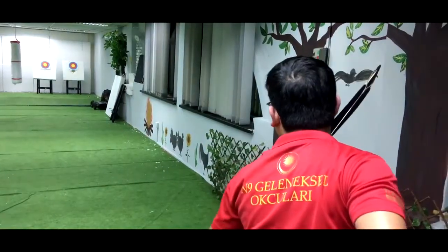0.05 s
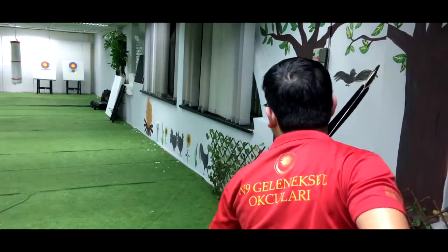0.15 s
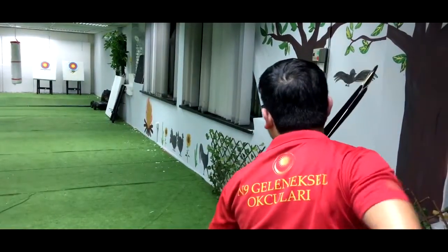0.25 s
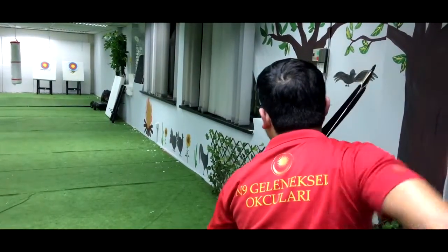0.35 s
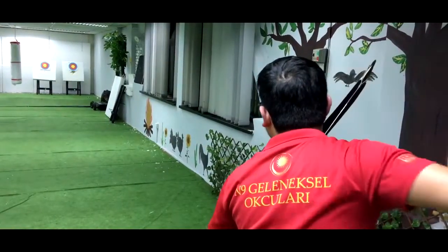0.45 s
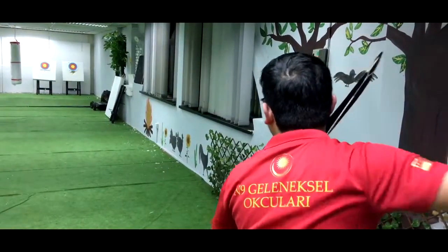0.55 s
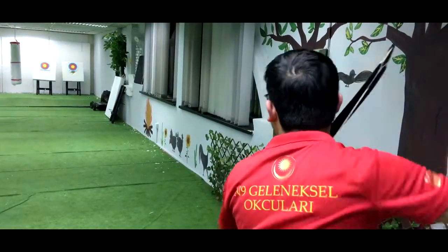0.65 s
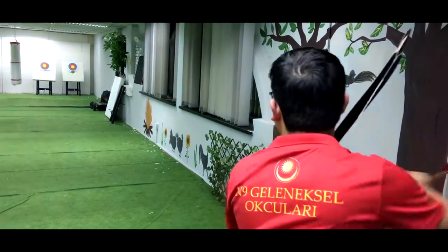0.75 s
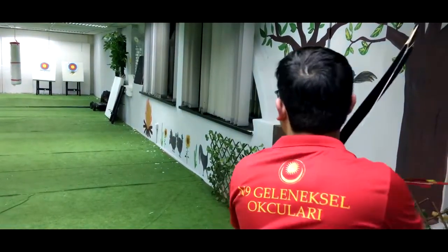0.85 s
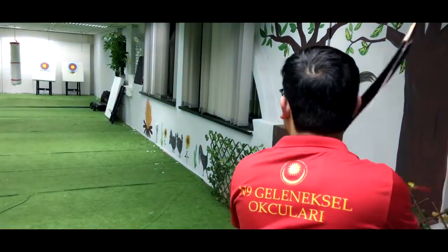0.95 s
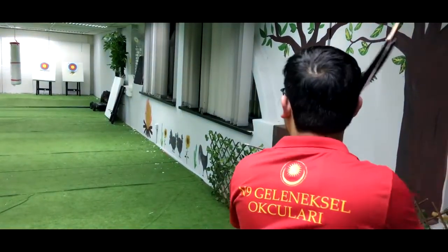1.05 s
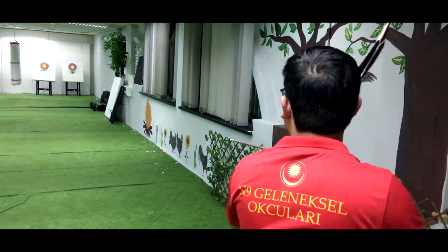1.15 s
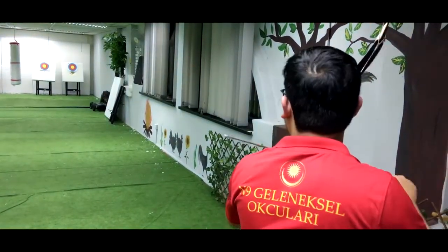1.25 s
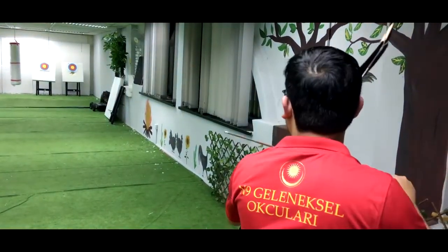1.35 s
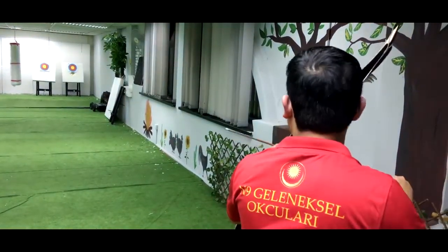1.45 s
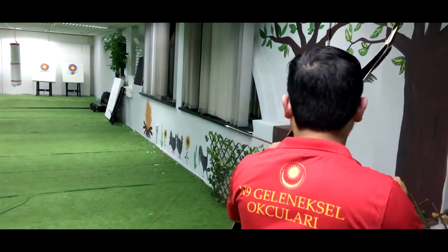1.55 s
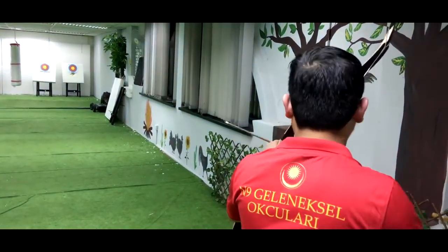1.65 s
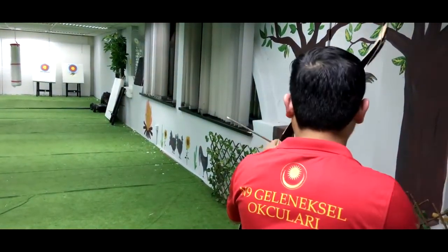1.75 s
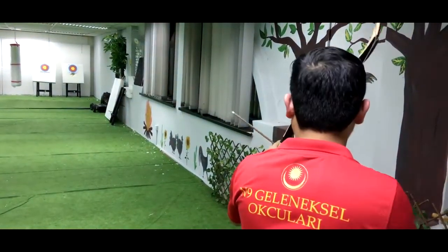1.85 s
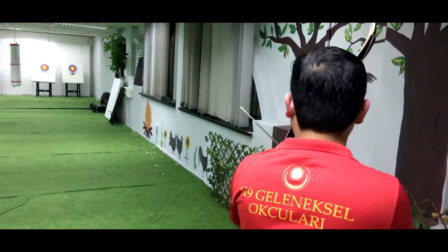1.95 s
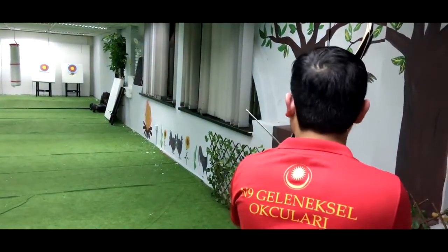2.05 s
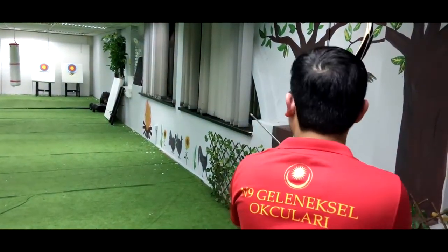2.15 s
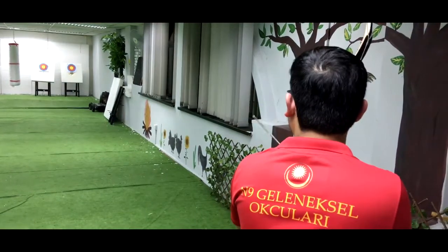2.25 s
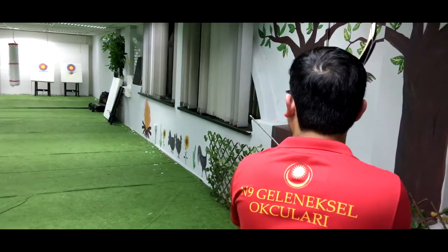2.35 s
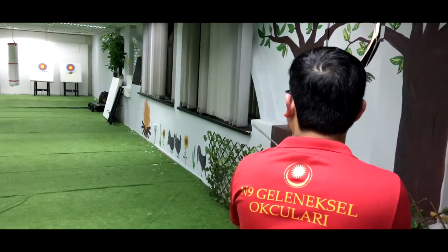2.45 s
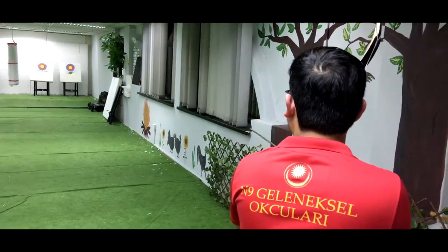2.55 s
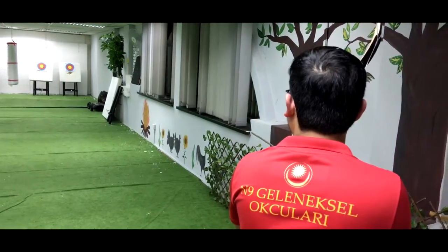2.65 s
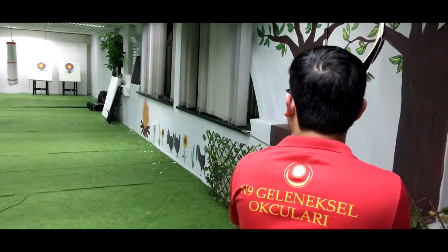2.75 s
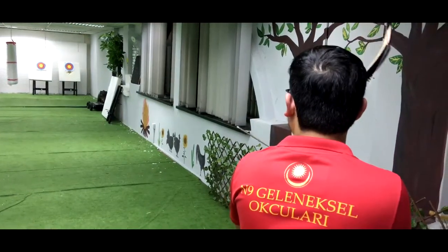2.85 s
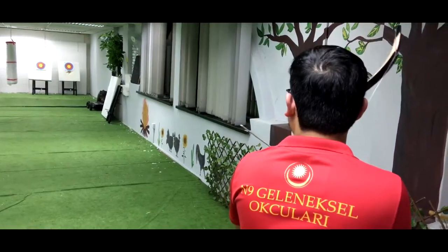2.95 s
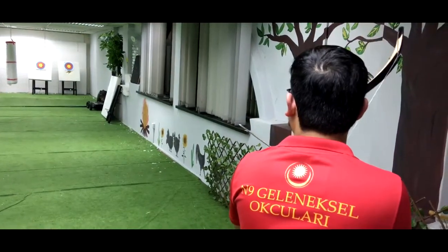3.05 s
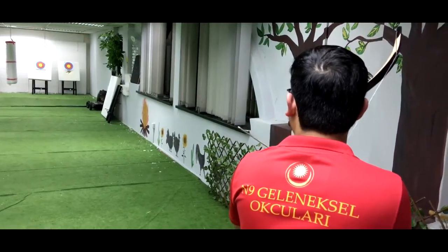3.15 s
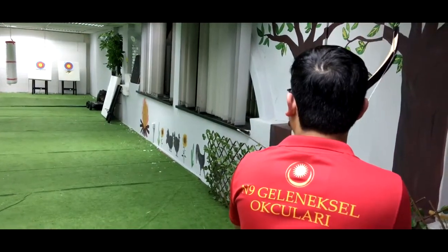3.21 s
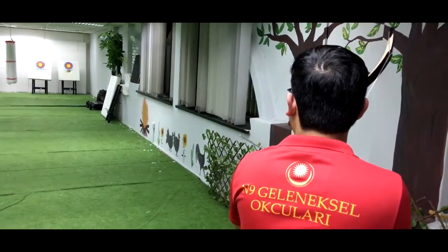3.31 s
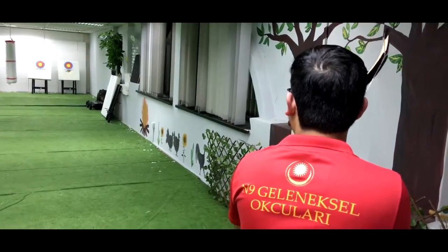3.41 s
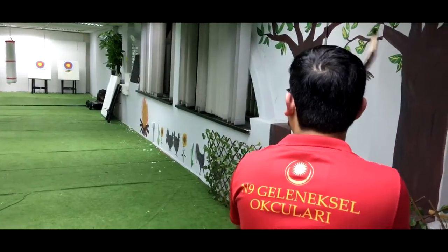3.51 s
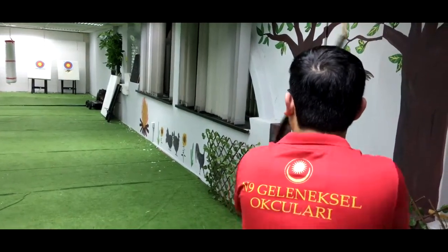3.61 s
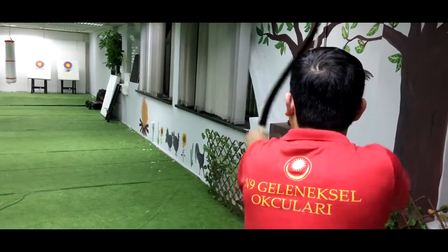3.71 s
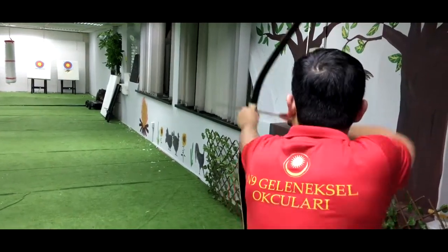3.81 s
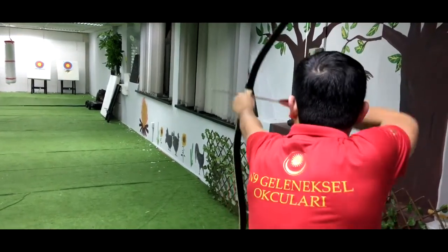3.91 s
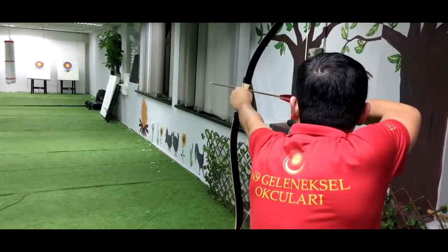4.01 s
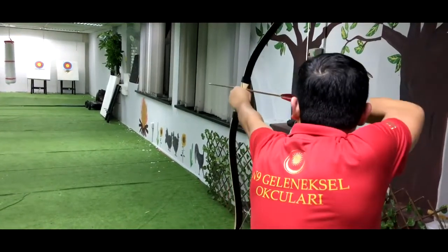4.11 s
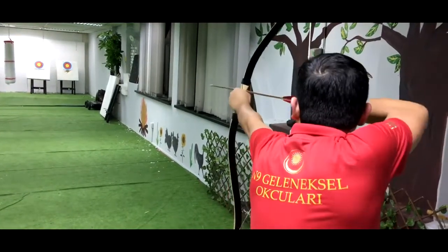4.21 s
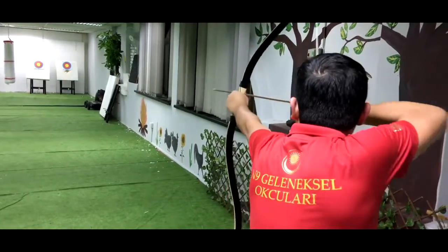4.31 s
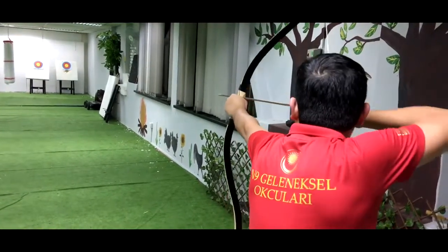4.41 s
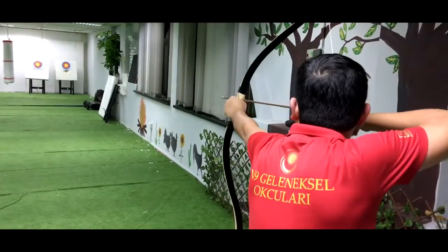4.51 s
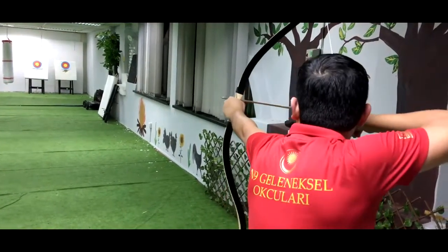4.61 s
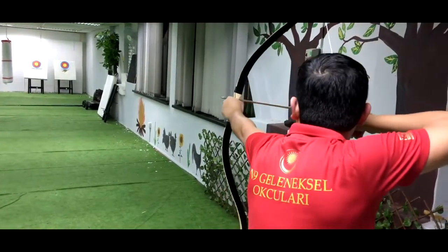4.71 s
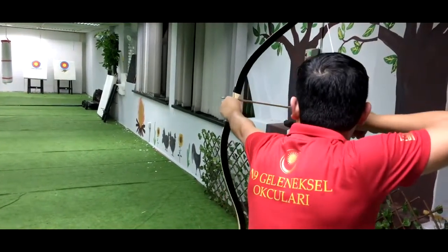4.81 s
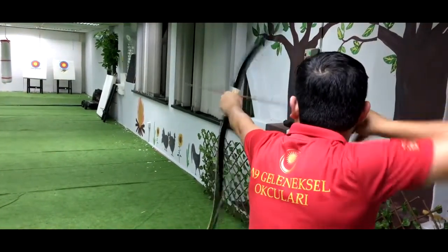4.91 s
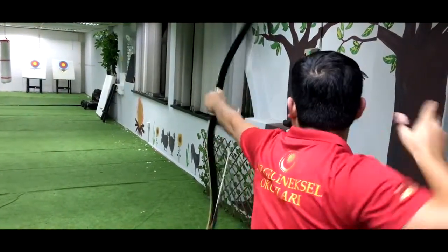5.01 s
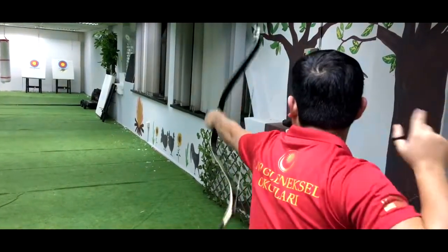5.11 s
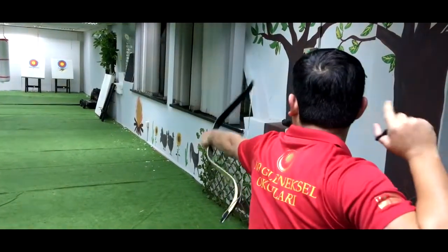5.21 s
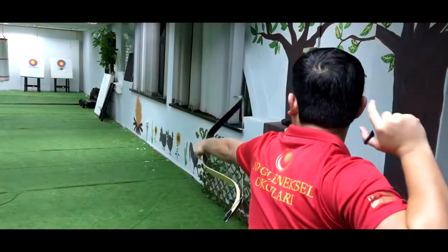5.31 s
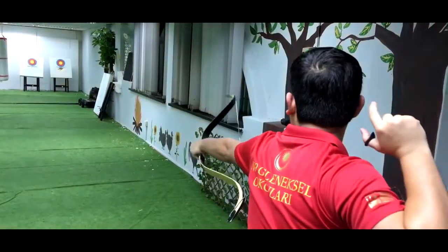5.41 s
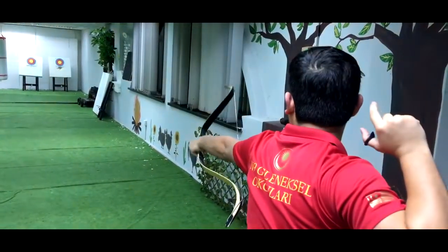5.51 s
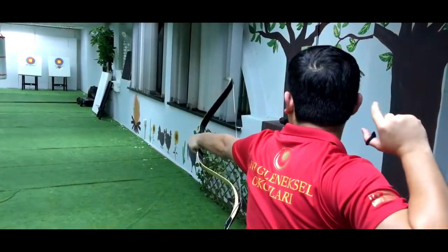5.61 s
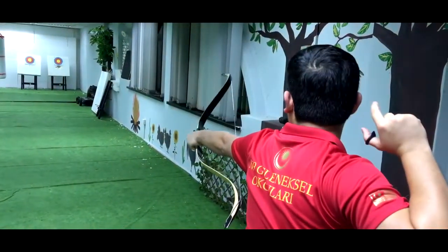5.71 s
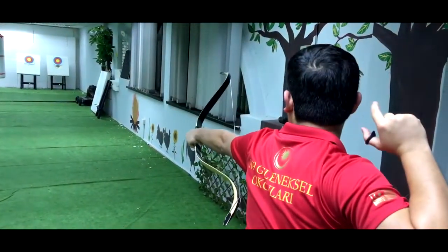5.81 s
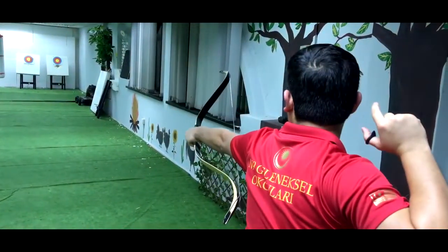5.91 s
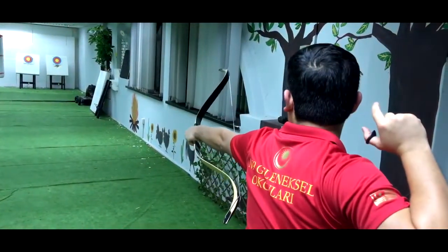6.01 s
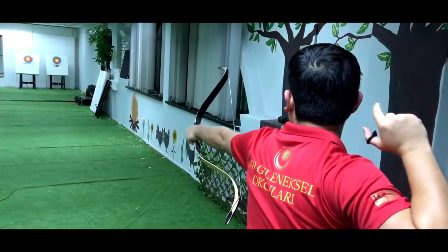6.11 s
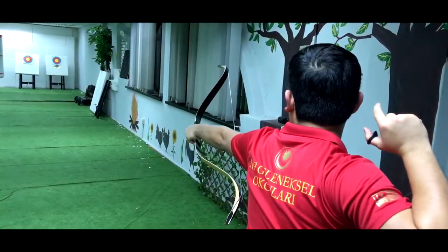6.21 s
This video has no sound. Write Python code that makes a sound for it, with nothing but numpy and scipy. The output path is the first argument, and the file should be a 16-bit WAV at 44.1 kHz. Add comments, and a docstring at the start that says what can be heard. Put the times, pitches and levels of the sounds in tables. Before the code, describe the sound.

Light rods knock brightly together amid soft cloth rustling, then one hard dry tick as an arrow is laid on a bow. A deep unsteady hum and faint hiss fill the wait. A very loud, bright string snap bursts out and slightly overloads the close microphone; about four tenths of a second later a papery crack and low thump come from the target, echoing through the hall.

```python
"""A low air-handling rumble fills a long indoor range. An archer pulls an arrow from a quiver: cloth and
feathers rustle as filtered noise, shafts clack as noise bursts that excite damped modes, and taps mark the
arrow being laid on the bow. The string slips, scrapes and slaps home, setting the limbs ringing. The arrow
tears the far target and its butt booms; echoes return, and the loud blows overload the small microphone."""
import sys
import numpy as np
from scipy import signal
from scipy.fft import rfft, irfft
from scipy.io import wavfile
from scipy.ndimage import uniform_filter1d

SR = 44100
rng = np.random.default_rng(int(sys.argv[2]) if len(sys.argv) > 2 else 0)


def wav_out(sig):
    """Save sig, one row per channel (or a flat mono array), as 16-bit PCM at SR to the path in sys.argv[1]."""
    wavfile.write(sys.argv[1], SR, np.round(np.clip(np.atleast_2d(sig).T, -1, 1) * 32767).astype(np.int16))


N = 276066


def gain_of(db):
    """The decibel is logarithmic: 20 dB is a factor of ten in amplitude."""
    return 10 ** (np.asarray(db) / 20)


def evened(x):
    """Equal mean power: scales a signal to rms 1."""
    return x / np.sqrt(np.mean(x ** 2) + 1e-20)


def read(points, hz):
    """Interpolates a spectrum on a logarithmic frequency axis, as the ear spaces pitch."""
    f, value = np.transpose(points)
    return np.interp(np.log(hz + 1), np.log(f + 1), value)


def colour(x, points):
    """Linear filtering: multiplies the spectrum by a response in dB."""
    response = gain_of(read(points, np.fft.rfftfreq(len(x), 1 / SR)))
    return irfft(rfft(x) * response, len(x))


def coloured_noise(count, points):
    """Subtractive synthesis: white noise filtered to a spectrum, at rms 1."""
    return evened(colour(rng.standard_normal(count), points))


def add(mix, s, sound):
    """Superposition: adds a sound to the mix from time s in seconds."""
    part = mix[round(s * SR):][:len(sound)]
    part += sound[:len(part)]


# Air-handling levels. Each row: time in seconds, deep hum level in dB, duct roar level in dB.
AIR_LEVELS = [(0, -35, -32), (1.4, -29.5, -33), (2.8, -28.5, -30.5), (4.2, -29, -30.5), (4.8, -30, -32.5),
              (5.5, -32, -30.5), (6.26, -30.5, -33.5)]
# Spectra of hum, roar and hiss. Each row: frequency in Hz, relative density in dB per Hz.
HUM_SPECTRUM = [(12, -53), (20, -17), (43, -11), (57, -0.5), (75, -9), (91, -0.5), (113, -5.5), (130, -9.5),
                (170, -62), (290, -120)]
ROAR_SPECTRUM = [(90, -37), (130, 2), (165, -2), (195, -3.5), (232, -1), (270, -6), (390, -12.5),
                 (450, -13), (520, -21.5), (900, -37)]
HISS_SPECTRUM = [(200, -16), (500, 0.5), (1000, 3), (2150, -2.5), (2500, -8), (3500, -10.5), (6000, -19.5),
                 (15000, -12)]
HISS_DB = -38


def air_handling():
    """Broadband flow noise: a lumpy deep hum and a duct roar at slow levels, under a steady hiss."""
    t = np.arange(N) / SR
    s, hum_db, roar_db = np.transpose(AIR_LEVELS)
    hum = coloured_noise(N, HUM_SPECTRUM) * gain_of(np.interp(t, s, hum_db))
    roar = coloured_noise(N, ROAR_SPECTRUM) * gain_of(np.interp(t, s, roar_db))
    hiss = coloured_noise(N, HISS_SPECTRUM) * gain_of(HISS_DB)
    return hum + roar + hiss


# Core of the hum, perhaps a distant engine. Each row: time in seconds, mean pitch in Hz, mean level in dB.
DRONE_PATH = [(0, 83.7, -32), (.3, 72.9, -31), (.9, 74, -30), (1.55, 87.1, -33), (1.7, 79.1, -27),
              (2.1, 82.36, -29.5), (2.501, 82, -33.5), (2.68, 80.5, -26), (3.301, 91.9, -30),
              (3.649, 88.96, -31.5), (3.75, 75, -30.5), (3.95, 92.24, -33), (4.27, 83.7, -25.5),
              (4.4, 71.6, -28.5), (4.85, 77, -32.5), (5.3, 79, -28), (5.55, 67.35, -30),
              (6.26, 88.6, -32.5)]
WAVER_HZ, THROB_DB = 4.96, 3  # rms random swings of pitch and level
FIFTH_DB = -9  # partial at 3/2 of the pitch, relative to the main tone


def slow_noise():
    """Low-pass filtering by two moving averages: a slow random drift at rms 1."""
    return evened(uniform_filter1d(uniform_filter1d(rng.standard_normal(N), 1500), 1500))


def drone():
    """Frequency and amplitude modulation: a tone and its fifth drift and waver within the hum."""
    t = np.arange(N) / SR
    s, hz, db = np.transpose(DRONE_PATH)
    pitch = np.interp(t, s, hz) + WAVER_HZ * slow_noise()
    level_db = np.interp(t, s, db) + THROB_DB * slow_noise()
    phase = 2 * np.pi * np.cumsum(pitch) / SR
    core = np.sin(phase) + gain_of(FIFTH_DB) * np.sin(3 * phase / 2)
    return np.sqrt(2) * core * gain_of(level_db)  # root two gives the main tone rms 1 before its level


def burst(t, start, rise_s, hold_s, fade_db_per_s):
    """Exponential decay: a linear rise and a hold, then a steady fall in dB."""
    fading_s = np.maximum(t - start - rise_s - hold_s, 0)
    return np.clip((t - start) / rise_s, 0, 1) * gain_of(-fade_db_per_s * fading_s)


# Cloth and feathers rustling. Each row: start in seconds, rise in seconds, hold in seconds, level in dB.
RUSTLE_EVENTS = [(-.02, .02, 0.19, -40.5), (0.388, 0.1, 0.011, -25.5), (0.696, 0.054, .01, -34),
                 (1.132, 0.045, 0.072, -39.5)]
# Spectrum of the rustle. Each row: frequency in Hz, relative level in dB.
RUSTLE_SPECTRUM = [(800, -13), (2500, -7), (6000, -4.5), (10000, -5), (16000, -8)]
RUSTLE_FADE_DB_PER_S = 380


def rustle():
    """Granular friction noise: many small rubs heard as noise of randomly uneven strength."""
    t, level = np.arange(N) / SR, np.zeros(N)
    for s, rise, hold, db in RUSTLE_EVENTS:
        # squaring curves the rise and doubles the fade in dB
        level += gain_of(db) * burst(t, s, rise, hold, RUSTLE_FADE_DB_PER_S / 2) ** 2
    unevenness_db = 1.8 * evened(uniform_filter1d(rng.standard_normal(N), 150))
    grains = rng.standard_normal(N) * gain_of(unevenness_db)
    return evened(colour(grains, RUSTLE_SPECTRUM)) * level


def ring(modes, rise_s):
    """Modal synthesis: a struck body sounds as a sum of exponentially damped sines."""
    t, out = np.arange(SR // 2) / SR, np.zeros(SR // 2)
    for hz, db, t60 in modes:
        out += gain_of(db - 60 * t / t60) * np.sin(2 * np.pi * hz * t)
    return out * (1 - np.exp(-t / rise_s))


# Mean modes of a shaft. Each row: frequency in Hz, relative level in dB, 60 dB decay time in seconds.
SHAFT_MODES = [(1637, 2, 0.13), (2000, -1, 0.16), (2700, -12, 0.079), (3190, -10, 0.11), (3530, -5, 0.13),
               (3930, -1, 0.064), (4540, -1, 0.074), (5070, 7.5, 0.034), (5200, -10, 0.085),
               (6700, -3, 0.068), (7140, -21, 0.054), (7300, -12, .05), (8250, -9, 0.069), (9800, 3, 0.062)]
RING_FULL_S = 0.0051  # shorter rattles ring the shafts more weakly


def knocks(rows, spread_hz, ring_db):
    """Impact excitation: each short rattle around its own pitch also rings the modes of the shafts."""
    out, t = np.zeros(N), np.arange(2048) / SR
    for s, db, hz, length in rows:
        ratio = 1 + spread_hz / hz
        shape = [(hz * ratio ** k, -7 * abs(k) ** 0.84) for k in range(-3, 4)]
        envelope = np.exp(-t / length) * (1 - np.exp(-5 * t / length))
        add(out, s, gain_of(db) * coloured_noise(len(t), shape) * envelope)
        modes = []
        for mode_hz, mode_db, t60 in SHAFT_MODES:
            detune, uneven = rng.standard_normal(2)  # every knock differs a little in tuning and balance
            favour_db = 1.47 * read(shape, mode_hz)  # modes near the pitch of the knock ring most
            modes.append((mode_hz * (1 + detune / 130), mode_db + 3 * uneven + favour_db, t60))
        strength = gain_of(db + ring_db) * min(length / RING_FULL_S, 1)
        add(out, s, strength * ring(modes, 0.00059))
    return out


# Shafts knocking each other. Each row: time in seconds, level in dB, centre of the crack in Hz,
# decay constant of the rattle in seconds.
CLACK_EVENTS = [(.032, -20, 14000, 0.0011), (0.037, -26, 4000, 0.0023), (0.0675, -10, 6300, 0.0025),
                (0.076, -17, 9000, 0.0023), (0.113, -10, 13000, 0.00066), (0.167, -23, 6500, 0.0041),
                (0.253, -32, 4000, .004), (0.291, -21, 5900, 0.0013), (0.292, -18.5, 4680, 0.0048),
                (.411, -28, 13000, .004), (0.453, -18, 5940, .008), (0.5023, -11, 4300, 0.002),
                (0.506, -9.5, 4770, 0.0074), (0.7435, -16.5, 6200, 0.0037), (0.7522, -17, 6030, 0.0065),
                (0.756, -22, 6300, 0.006), (.766, -23, 7000, 0.012), (0.798, -21.5, 6350, 0.0025),
                (0.806, -23, 7600, .003), (0.872, -36, 5650, 0.0045), (2.053, -35, 10970, 0.006),
                (2.169, -34, 3400, 0.0043), (2.176, -33, 3780, .004), (3.047, -33.5, 7100, .008)]


def clacks():
    """Collision of light rods: shafts crack together and ring as the arrow is drawn out."""
    return knocks(CLACK_EVENTS, spread_hz=4300, ring_db=-7)


# Each end of the hall's decay. Each row: frequency in Hz, 60 dB decay time in seconds.
HALL_DECAY = [(150, 0.67), (500, 1), (1200, 0.58), (3000, 0.54), (7000, 0.6), (14000, 0.38)]


def hall(x, count=6):
    """Diffuse reverberation: dense random reflections, each band decaying at its own rate."""
    taps = np.zeros((count, SR))
    at = np.arange(200, SR - 20, 10) + rng.integers(0, 10, (count, (SR - 211) // 10))
    np.put_along_axis(taps, at, rng.choice([-1., 1.], at.shape), 1)
    hz, t, bands = signal.stft(taps, SR, nperseg=256)
    decay = gain_of(-60 * t / read(HALL_DECAY, hz)[:, None])
    tails = signal.istft(bands * decay, SR, nperseg=256)[1]
    # every 300 samples of sound begin to excite another set of reflections
    place = (np.arange(N) / 300 - np.arange(count)[:, None] + 1) % count
    shares = np.sin(np.pi / 2 * np.minimum(place, 2))  # overlapping arches whose squares sum to 1
    wet = signal.fftconvolve(x * shares, tails / np.linalg.norm(tails[0]), axes=1)
    return wet[:, :N].sum(0)


# The arrow tapping the bow as it is laid on. Each row: time in seconds, level in dB, centre of the
# crack in Hz, decay constant of the rattle in seconds.
TAP_EVENTS = [(.9468, -4.5, 4500, .0008), (.9535, -16, 3300, .0035), (.958, -24, 2500, .018)]


def taps_on_bow():
    """Short-impulse excitation: a wide dry tick with faint modal ringing."""
    return knocks(TAP_EVENTS, spread_hz=5000, ring_db=-24)


# Dull and bright string noise. Each row: frequency in Hz, relative level in dB.
DULL_SPECTRUM = [(150, -14), (600, -6), (1300, -2), (2100, 0), (3200, -2), (5000, -16), (16000, -45)]
BRIGHT_SPECTRUM = [(150, -27), (600, -27), (1100, -24), (2000, -21), (3000, -5.5), (4000, 0), (5000, 5),
                   (6000, -1), (7000, 2.5), (8200, 0), (9700, 1.5), (12000, -1), (16000, -3)]
SLIP_S, FLICK_S, SLAP_S = 4.9775, 4.9835, 4.9942  # string slips, feathers flick past the grip, string slaps
SNAP_S = .0007  # rise time of scrape, buzz and tear
SCRAPE_DB, BUZZ_DB, FLICK_DB = -15.5, -2.5, -13
SCRAPE_BRIGHT, SLAP_BRIGHT, BUZZ_BRIGHT = 0.38, .8, 0.98  # bright share of the power
BRIGHTEN_S, FLICK_LENGTH_S = 0.0039, .0013


def string_and_arrow():
    """Friction, then impact: the arrow scrapes and brightens, feathers flick, the string buzzes home."""
    t, out = np.arange(SLIP_S, SLAP_S + 0.14, 1 / SR), np.zeros(N)
    scrape_share = SCRAPE_BRIGHT * np.minimum((t - SLIP_S) / BRIGHTEN_S, 1) ** 2
    buzz_share = np.interp(t, [SLAP_S, SLAP_S + BRIGHTEN_S], [SLAP_BRIGHT, BUZZ_BRIGHT])
    share = np.clip(np.where(t < SLAP_S, scrape_share, buzz_share), 0, 1)
    dull = coloured_noise(len(t), DULL_SPECTRUM)
    bright = coloured_noise(len(t), BRIGHT_SPECTRUM)
    noise = np.sqrt(1 - share) * dull + np.sqrt(share) * bright
    scrape = gain_of(SCRAPE_DB) * np.minimum((t - SLIP_S) / SNAP_S, 1) * (t < SLAP_S + SNAP_S)
    buzz = gain_of(BUZZ_DB) * burst(t, SLAP_S, SNAP_S, hold_s=0.015, fade_db_per_s=620)
    flick_shape = np.exp(-((t - FLICK_S) / FLICK_LENGTH_S) ** 2)
    flick = gain_of(FLICK_DB) * flick_shape * evened(np.gradient(bright))  # the slope favours treble
    add(out, SLIP_S, (scrape + buzz) * noise + flick)
    return out


# Modes of the bow limbs. Each row: frequency in Hz, level in dB, 60 dB decay time in seconds.
LIMB_MODES = [(256, -15.5, 0.098), (502, -19.5, 0.21), (554, -19.5, 0.2), (587, -26, 0.12),
              (798, -20, 0.082), (1238, -18, 0.1), (2090, -24, 0.061)]


def limbs():
    """Free vibration: the limbs ring in their damped modes once the string slaps home."""
    out = np.zeros(N)
    add(out, SLAP_S, ring(LIMB_MODES, 0.0043))
    return out


# Spectrum of tearing paper. Each row: frequency in Hz, relative level in dB.
TEAR_SPECTRUM = [(100, -25), (400, 4), (1000, -6), (3000, -4.5), (6000, -7.5), (10000, -11), (16000, -12.5)]
HIT_S, TEAR_DB = 5.3698, -5


def paper_tear():
    """Fracture noise: the arrow point tears the paper face in a brief broadband crack."""
    t, out = np.arange(0, .08, 1 / SR), np.zeros(N)
    envelope = burst(t, 0, SNAP_S, hold_s=0.0071, fade_db_per_s=440)
    add(out, HIT_S, gain_of(TEAR_DB) * envelope * coloured_noise(len(t), TEAR_SPECTRUM))
    return out


# Booms of the target butt. Each row: frequency in Hz, level in dB, length in seconds.
BUTT_BOOMS = [(156.4, -1, 0.036), (400.8, -11.5, 0.025), (534, -11.5, 0.027), (713, -15, 0.053),
              (954, -24.5, 0.044), (1146, -20.5, 0.076)]
BOOM_S = 5.372


def butt_boom():
    """Guided propagation: each boom of the butt swells as the walls guide it down the range."""
    out = np.zeros(N)
    for hz, db, length in BUTT_BOOMS:
        t = np.arange(0, length, 1 / SR)
        swell = np.sin(np.pi * (t / length) ** 1.7)
        add(out, BOOM_S, gain_of(db) * np.sin(2 * np.pi * hz * t) * swell)
    return out


# Slap between the ends of the range. Each row: delay in seconds, relative level in dB.
END_WALL_ECHOES = [(.07, -20), (.105, -8), (.133, -6), (.16, -16), (.225, -15)]
# Colour of those echoes. Each row: frequency in Hz, gain in dB.
END_WALL_COLOUR = [(100, -22), (180, 4), (400, 0.5), (700, 0), (1100, 3.5), (1600, -16), (3000, -20),
                   (8000, -28)]
CLEAN_SHARE, CLEAN_WIDTH_S = .7, .0005  # unsmeared part of each echo, and the width of its soft pulse


def end_walls(x):
    """Discrete reflection: late dull echoes, a soft pulse for the bass and a smeared remainder."""
    taps, t = np.zeros(SR // 2), np.arange(2000) / SR
    pulse = np.exp(-(t / CLEAN_WIDTH_S - 3) ** 2)
    clean = CLEAN_SHARE * pulse / pulse.sum()
    for delay, db in END_WALL_ECHOES:
        smear = rng.standard_normal(len(t)) * np.exp(-t / 0.013)
        smeared = (1 - CLEAN_SHARE) * smear / np.linalg.norm(smear)
        add(taps, delay, gain_of(db) * (clean + smeared))
    return signal.fftconvolve(x, colour(taps, END_WALL_COLOUR))[:N]


def scene():
    """Direct-to-reverberant balance: every source but the air handling is sent to the hall, and all are mixed
    by superposition."""
    air = air_handling() + drone()
    handling = rustle() + clacks() + taps_on_bow()
    shot = string_and_arrow() + limbs()
    tear, boom = paper_tear(), butt_boom()
    to_hall = gain_of(-6.0) * handling + gain_of(-2.0) * shot + gain_of(-3.5) * tear + gain_of(-10.5) * boom
    echoes = end_walls(tear + boom + gain_of(-17) * shot)
    return (air + handling + shot + tear + boom + hall(to_hall) + echoes)[None]


# Response of the microphone port. Each row: frequency in Hz, gain in dB.
MIC_RESPONSE = [(20, -0.48), (4000, 1.06), (4900, -3), (5900, 3.5), (7700, -3), (9000, 0), (10500, -5.5),
                (12000, -3), (16000, -9)]
EDGE_HZ = 15750  # upper band limit


def record(dry):
    """Dynamic compression and clipping: port colour, gain that ducks after blows, overload, band limit."""
    x = colour(dry[0], MIC_RESPONSE)
    power_db = 10 * np.log10(abs(uniform_filter1d(x ** 2, 800)) + 1e-12)
    fall = np.arange(N) * 6.3 / SR  # the held peak falls at 6.3 dB a second
    held_db = np.maximum.accumulate(power_db + fall) - fall
    over_db = np.maximum(held_db + 9.0, 0)  # excess over -9 dB
    slow_db = signal.lfilter([.0005], [1, -.9995], over_db)
    x = np.clip(x / gain_of(0.083 * slow_db), -.97, .97)
    low_pass = signal.firwin(2047, EDGE_HZ, window=("kaiser", 9), fs=SR)
    return signal.oaconvolve(x, low_pass, "same")[None]


dry = scene()
out = record(dry)
wav_out(out)
```